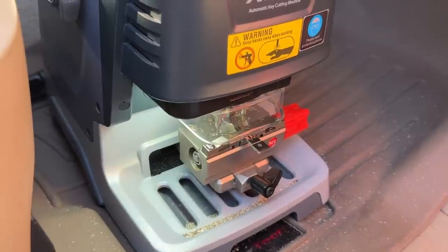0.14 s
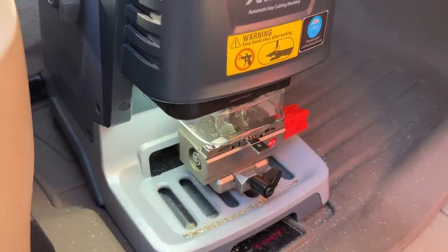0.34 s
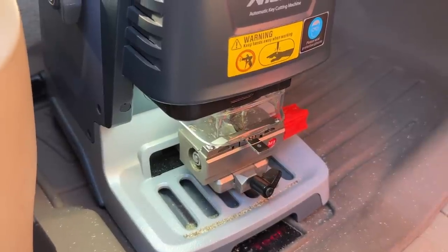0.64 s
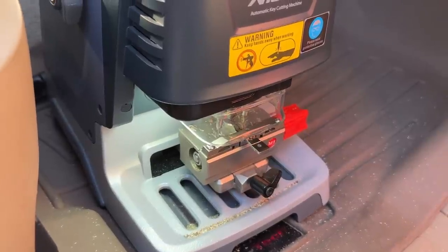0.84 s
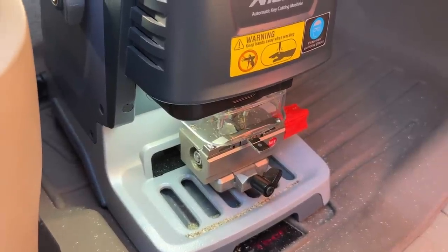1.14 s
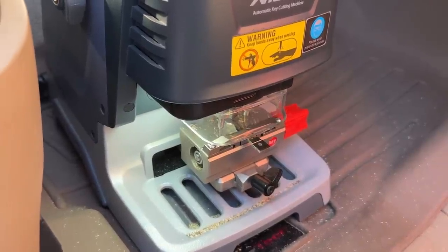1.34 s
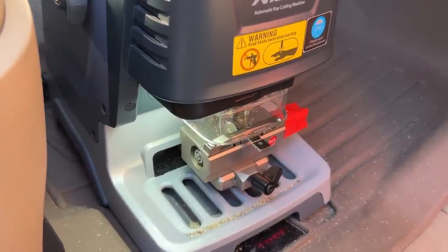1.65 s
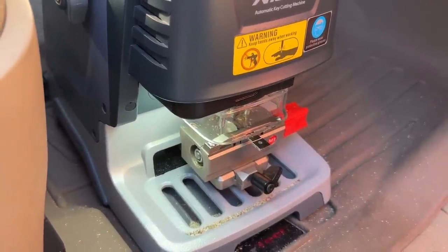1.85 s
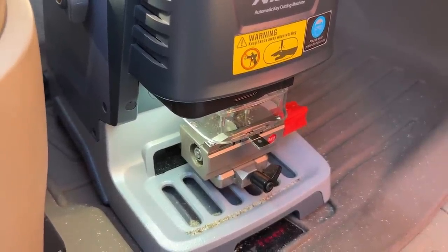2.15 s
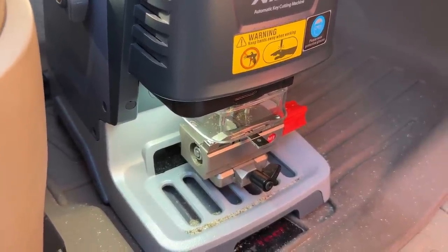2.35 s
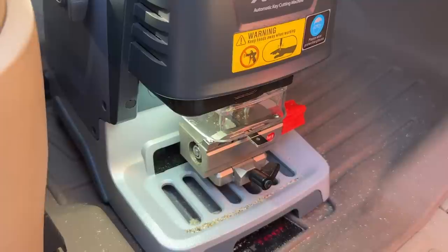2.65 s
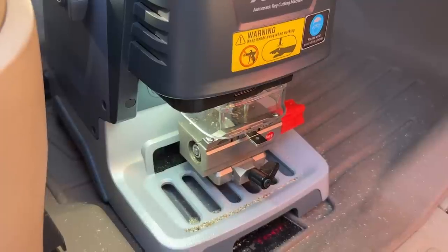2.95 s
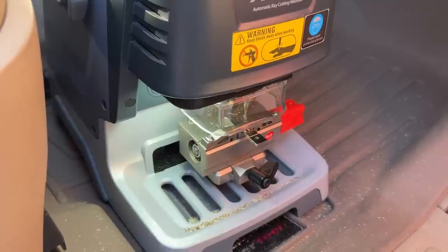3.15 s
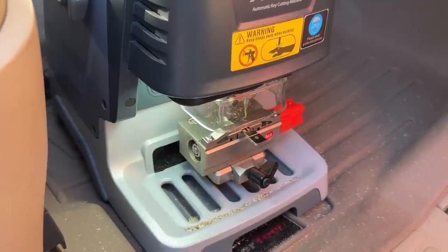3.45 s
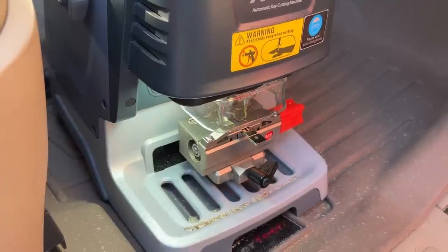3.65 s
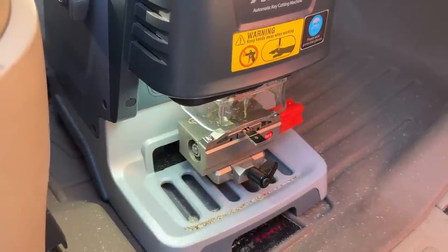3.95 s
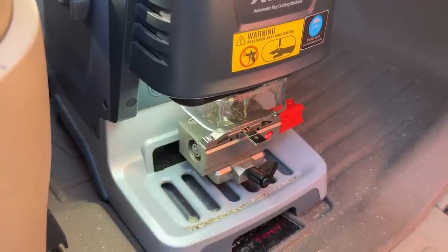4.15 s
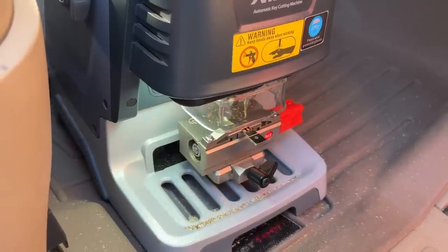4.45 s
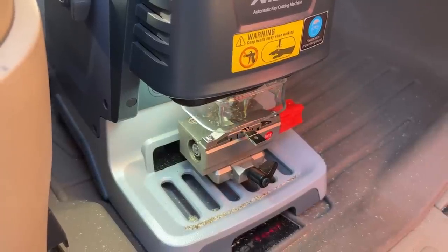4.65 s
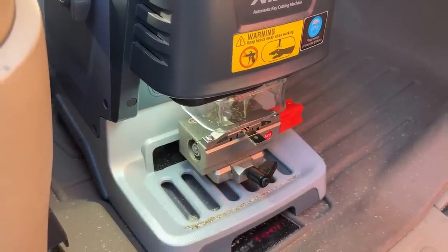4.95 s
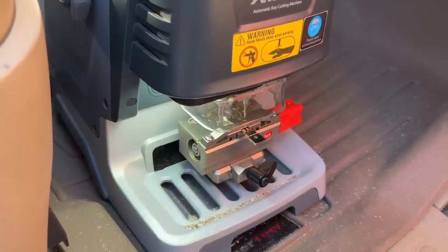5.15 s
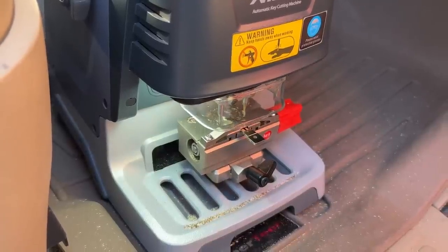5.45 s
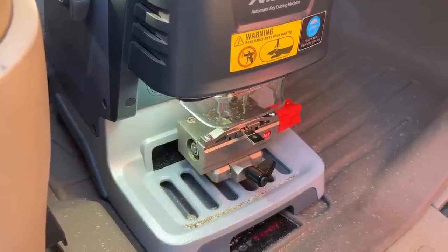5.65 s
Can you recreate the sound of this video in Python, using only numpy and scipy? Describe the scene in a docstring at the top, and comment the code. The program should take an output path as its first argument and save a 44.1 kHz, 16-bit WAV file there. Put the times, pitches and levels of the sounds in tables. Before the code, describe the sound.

A small key-cutting machine hums and grinds steadily, lifts with a quick whine, trims briefly again, then its motor slides down in pitch.

```python
"""A small automatic key cutter on a bench, over low workshop rumble: the carriage steppers slow from a traverse
and the cutter mills a blank while the spindle hums at its turning rate. It lifts for a fast, whining traverse and
trims once more; the drive brakes the spindle, its tones slide down, and the carriage jerks off on a last traverse.
Tones lock to the running count of spindle turns; chips, air and rumble are shaped noise, heard at two close ports."""
import sys
import numpy as np
from scipy import signal
from scipy.fft import rfft, irfft, next_fast_len
from scipy.io import wavfile

SR = 44100
rng = np.random.default_rng(int(sys.argv[2]) if len(sys.argv) > 2 else 0)


def materialize(psi):
    """Save the field psi as 16-bit PCM at rate SR to the path in sys.argv[1].

    A 1-D psi becomes a single channel; in a 2-D psi each row is a channel.
    """
    bounded = np.clip(np.atleast_2d(psi).T, -1, 1)
    quanta = np.round(bounded * 32767).astype(np.int16)
    wavfile.write(sys.argv[1], SR, quanta)


N = 256220


def amp(db):
    """Gain of a level in dB."""
    return 10 ** (np.asarray(db) / 20)


def seconds():
    """Time of every sample."""
    return np.arange(N) / SR


def white():
    """White noise of rms 1."""
    return rng.standard_normal(N)


def gate(on_s, off_s, fade_s):
    """0 to 1 and back between two times, with straight edges."""
    t = seconds()
    return np.clip(np.minimum(t - on_s, off_s - t) / fade_s, 0, 1)


def at_hz(rows, hz):
    """Columns of a table read on a log-frequency axis."""
    edge_hz, *columns = np.transpose(rows)
    log_hz = np.log(np.maximum(hz, 1))
    return [np.interp(log_hz, np.log(edge_hz), column) for column in columns]


def drift(rate_hz):
    """Slow random curve of spread 1: white noise through a two-pole lowpass, run in for 1 s."""
    r = np.exp(-2 * np.pi * rate_hz / SR)
    slow = signal.lfilter([1], [1, -2 * r, r * r], rng.standard_normal(N + SR))[SR:]
    return slow / slow.std()


def coloured(x, spectrum):
    """Shapes a white signal to a spectrum; rms 1."""
    size = next_fast_len(N)
    gain_db, = at_hz(spectrum, np.fft.rfftfreq(size, 1 / SR))
    out = irfft(rfft(x, size) * amp(gain_db), size)[:N]
    return out / out.std()


def tone(cycles, rms_db, waver_db, rate_hz=14.0):
    """A sine on a running count of cycles, its level wavering a little."""
    level = np.sqrt(2) * amp(rms_db + waver_db * drift(rate_hz))
    return level * np.sin(2 * np.pi * (cycles + rng.random()))


RUN_TURNS_PER_S, OVERSHOOT_TURNS_PER_S, SETTLE_S = 200.3, 4.53, .328
# drive braking the spindle: (time [s], speed loss [turns/s per s])
BRAKING = [(3.616, 0), (4.085, 36.7), (4.676, 102.6), (4.965, 109.6), (5.25, 96.8), (5.81, 87.7)]


def spindle_speed():
    """Turns per second: settles from a small overshoot, then the drive brakes it."""
    t = seconds()
    loss_per_s = np.interp(t, *np.transpose(BRAKING))
    overshoot = OVERSHOOT_TURNS_PER_S / np.cosh(t / SETTLE_S)
    return RUN_TURNS_PER_S + overshoot - np.cumsum(loss_per_s) / SR


# free spindle, bench mount resonating near full speed: (speed below running [turns/s], first order [dB],
# third order [dB], flute hiss [dB], air and bearing whirr [dB])
FREE_SPIN = [(-15.5, -17, -32.5, -58.5, -31.5), (-0.5, -20, -43, -53.5, -43), (6.5, -24, -45, -59.5, -45),
             (9, -27, -42.5, -59.5, -44.5), (15, -32.5, -53.5, -73, -47.5), (19, -38.5, -52, -72, -51),
             (28, -40, -62, -71, -49.5), (45, -64, -65, -78.5, -51), (50, -43.5, -64.5, -81, -53),
             (71.5, -47, -65, -82, -54.5), (100.5, -57, -72, -82, -55.5), (161, -75, -82, -87, -53.5)]


def free_spin(speed):
    """Levels of the unloaded spindle in dB, set by its speed alone."""
    lost, *levels = np.transpose(FREE_SPIN)
    return [np.interp(RUN_TURNS_PER_S - speed, lost, db) for db in levels]


# cuts: (touch [s], lift [s], decay constant [s], milling hiss once deep [dB],
# third order from the flutes [dB], change of the pole tones [dB])
CUTS = [(.07, 2.795, 0.036, -39.5, -33, -4), (3.46, 3.965, 0.097, -38.5, -32, 2)]
TOUCH_S = 0.046            # bite rise
CHIP_POWER = 3             # chips stop sooner than the load on the spindle
LOADED_DB = 3.0            # first-order gain under load
ASIDE = 0.52               # share of the free third order that the flutes cannot cancel
SHALLOW_DB, DEEPEN_S = -5.5, 0.27   # a cut starts this much softer and deepens


def bites():
    """Cutter engagement 0-1, one row a cut: straight rise, exponential release."""
    t = seconds()
    rows = []
    for touch_s, lift_s, decay_s, *_ in CUTS:
        rise = np.clip((t - touch_s) / TOUCH_S, 0, 1)
        rows.append(rise * np.exp(-np.maximum(t - lift_s, 0) / decay_s))
    return np.array(rows)


def shake(bite, first_db, third_db):
    """Load lifts the first order; flutes oppose the free third order, so it dips as they touch and lift."""
    flutes = sum(amp(cut[4]) * b for cut, b in zip(CUTS, bite))
    free_third = amp(third_db)
    third = np.hypot(flutes - free_third, ASIDE * free_third)
    return first_db + LOADED_DB * bite.sum(axis=0), 20 * np.log10(third)


# further spindle orders: (order, level over third order [dB], extra when running free [dB])
OVERTONES = [(2.0, -9.5, -2), (4.0, -13.5, 5), (5.0, -16, 6), (6.0, -15, 2), (7.0, -21, -3.5),
             (8.0, -29, 5.5), (10.0, -21, -6), (12.0, -30, 2)]


def spindle(turns, free, first_db, third_db):
    """Unbalance shakes the machine once a turn; the flutes add higher orders."""
    out = tone(turns, first_db, 0.18) + tone(3 * turns, third_db, 0.91)
    for order, over_db, free_db in OVERTONES:
        out += tone(order * turns, third_db + over_db + free_db * free, 1.1)
    return out


# milling spectrum: (frequency [Hz], relative level per Hz [dB])
CHIPS = [(200, -16), (500, -8), (800, -3), (1300, -3.5), (1650, -7.5), (2100, -3.5), (2800, -1.5),
         (3500, -5.5), (4300, -1.5), (5200, -10), (7600, -11), (8500, -9.5), (9500, -16.5), (10300, -8.5),
         (12000, -23), (14500, -16), (16000, -26.5)]


def milling(turns, once=0.22, twice=0.27):
    """Chips break off as dense uneven clicks, bunched on each turn of the cutter; rms 1."""
    clicks = white() * amp(2.5 * np.minimum(rng.exponential(1, N), 4))
    bunching = 1 + once * np.cos(2 * np.pi * turns) + twice * np.cos(4 * np.pi * turns + 1.1)
    load = amp(0.88 * drift(1.2) + 0.72 * drift(35.0))
    return coloured(clicks * bunching * load, CHIPS)


def chip_gain(bite, free_db):
    """Gain of the milling hiss: chips during a cut, bare flutes between, summed as powers."""
    t = seconds()
    cutting = 0
    for (touch_s, _, _, hiss_db, *_), b in zip(CUTS, bite):
        shallow = np.exp(-np.maximum(t - touch_s, 0) / DEEPEN_S)
        cutting = cutting + amp(hiss_db + SHALLOW_DB * shallow) * b ** CHIP_POWER
    return np.hypot(cutting, amp(free_db))


POLE_ORDER = 10.458        # motor pole tone, cycles per spindle turn
# pole tone multiples: (multiple, level before speed and load changes [dB])
POLES = [(1, -61.5), (2, -70.5), (3, -82.5), (4, -82), (5, -83), (6, -78), (7, -86), (8, -85), (10, -91)]
# ball bearings and belt: (order)
BEARING_ORDERS = [4.485, 6.0, 8.3, 13.26, 14.25, 17.2, 18.7, 27.4, 36.2, 45.0, 56.3, 65.1]
# the same tones: (level before the speed change [dB])
BEARING_DB = [-73, -77, -77, -79, -73, -75.5, -73, -72, -79.5, -91, -85, -89]
# offset at running speed, then change per turn/s lost
POLE_OFFSET_DB, POLE_DB_PER_LOST = 2.06, -0.016
BEARING_OFFSET_DB, BEARING_DB_PER_LOST = 0.71, -0.089


def whine(turns, speed, load_db):
    """Motor pole, bearing and belt tones, locked to the spindle; they waver more as it slows."""
    lost = RUN_TURNS_PER_S - speed
    slowing = np.clip(5 * (1 - speed / 200), 0, 1)
    poles = sum(tone(k * POLE_ORDER * turns, db, 1.2 + 2.5 * slowing, 18) for k, db in POLES)
    bearings = sum(tone(order * turns, db, 3 + 2 * slowing, 30)
                   for order, db in zip(BEARING_ORDERS, BEARING_DB))
    pole_gain = amp(POLE_OFFSET_DB + POLE_DB_PER_LOST * lost + load_db)
    return poles * pole_gain + bearings * amp(BEARING_OFFSET_DB + BEARING_DB_PER_LOST * lost)


def leak(motor, cut_hz=4500, gain_db=-12.5):
    """A dull part of the motor whine escapes past the casing."""
    lowpass = signal.butter(2, cut_hz, fs=SR, output="sos")
    return amp(gain_db) * signal.sosfilt(lowpass, motor)


# casing resonances: (frequency [Hz], width [Hz], gain [dB], share reaching the ports out of phase [0-1])
HOUSING = [(739, 7.4, 28.5, 0.3), (790, 34, 17.5, 0.5), (878, 70, 17, 0.52), (928, 80, 13.5, 0.3),
           (1199, 30, 16.5, .4), (1348, 37, 3, 0.6), (1470, 62, -4.5, 0.7), (1603, 29, 14, 0.95),
           (2152, 157, 8, 0), (2315, 58, 19, 0.3), (2616, 64, 8, 0.56), (2666, 31, 22, 0.52),
           (2800, 430, 14, 0.76), (3345, 46, 13.5, 0.08), (3660, 78, 11, 0.17), (4020, 32.6, 31.5, 0.81),
           (4140, 84, 23, 0.92), (4300, 86, 6, .5), (6930, 560, 7, 0.1), (7170, 92, -2, 1),
           (7450, 89, 2.5, 0.8), (8200, 130, 8.5, .4), (9270, 160, 14, 0.7), (11600, 120, 5.5, 0.96),
           (15400, 190, 18, .05)]


def housing(x):
    """The casing rings at its resonances; each reaches the two ports partly in phase, partly against."""
    out = np.zeros((2, N))
    for k, (hz, width_hz, gain_db, against) in enumerate(HOUSING):
        r = np.exp(-np.pi * width_hz / SR)
        against = np.clip(against, 0, 1)
        ring = signal.lfilter([1, 0, -1], [1, -2 * r * np.cos(2 * np.pi * hz / SR), r * r], x)
        late = np.gradient(ring) * SR / (2 * np.pi * hz)     # a quarter cycle apart
        pair = np.sqrt(1 - against ** 2) * ring + against * late * [[1], [-1]]
        out += (-1) ** k * amp(gain_db) * (1 - r * r) / 2 * pair
    return out


# carriage speeding up and braking: (start [s], length [s], from [Hz], to [Hz],
# bend away from the fast end [exponent], from peak level [dB], to peak level [dB])
RAMPS = [(0, .095, 7300, 3300, 2.8, -53, -49), (2.77, .065, 2200, 8500, 1.2, -52, -68),
         (3.21, .09, 2690, 2400, 1.1, -45, -45), (3.287, .165, 9600, 1950, 1.2, -66, -39),
         (5.374, .081, 1900, 9700, 1.1, -39.5, -65), (5.43, .035, 2500, 2460, 1.1, -42, -42)]
RAMP_HOLD_S, RAMP_FADE_S = .004, .012


def ramps(third_db=-10, double_db=-14):
    """The step rate climbs and falls in short stairs; a third of it and its double sound along."""
    out = np.zeros(N)
    stairs_s = (np.floor(seconds() / RAMP_HOLD_S) + .5) * RAMP_HOLD_S
    for start_s, length_s, from_hz, to_hz, bend, from_db, to_db in RAMPS:
        done = np.clip((stairs_s - start_s) / length_s, 0, 1)
        slowed = (done if from_hz > to_hz else 1 - done) ** bend
        step_hz = max(from_hz, to_hz) - abs(from_hz - to_hz) * slowed
        steps = 2 * np.pi * np.cumsum(step_hz) / SR
        wave = np.sin(steps) + amp(third_db) * np.sin(steps / 3) + amp(double_db) * np.sin(2 * steps)
        level_db = from_db + (to_db - from_db) * done + 4 * drift(120.0)
        out += amp(level_db) * gate(start_s, start_s + length_s, RAMP_FADE_S) * wave
    return out


FEED_HZ, FEED_SWELL_S = 932.8, 0.13
# feed tones: (multiple, level [dB])
FEED_ORDERS = [(2.0, -61), (3.0, -47.5), (4.0, -57.5), (5.0, -60), (6.0, -62.5), (7.0, -65.5)]


def feed(bite):
    """Stepper feed tones that swell in and follow the first cut."""
    t = seconds()
    swell = bite ** CHIP_POWER * np.clip((t - CUTS[0][0]) / FEED_SWELL_S, 0, 1)
    return swell * sum(tone(k * FEED_HZ * t, db, 2.9) for k, db in FEED_ORDERS)


TRAVERSE_HZ = 332.4        # repetition rate
# traverse tones: (multiple, level before each traverse's gain [dB])
TRAVERSE_TONES = [(4, -66), (9, -71), (10, -72), (11, -73), (12, -66), (14, -74), (16, -61), (17, -79),
                  (18, -79), (20, -61), (21, -80), (22, -73), (24, -80), (26, -83), (28, -76), (29, -73),
                  (32, -74), (33, -61), (34, -74), (35, -73), (38, -82), (40, -68), (42, -61), (43, -66),
                  (45, -73), (46, -69), (47, -78)]
# driver hiss spectrum: (frequency [Hz], relative level per Hz [dB])
CHOPPER = [(2000, -3.5), (5000, -10.5), (9000, -23.5), (12500, -5), (14000, 3), (16000, -25)]
# fast traverses: (drivers on [s], off [s], hiss after the surge [dB], cruise start [s], cruise end [s],
# tone gain [dB], whistle [Hz], whistle peak factor [dB], whistle end [s])
TRAVERSES = [(-.02, .08, -65, -.02, .08, -14, 15320, -62, .16),
             (2.8, 3.48, -64, 2.82, 3.4, -9, 13890, -61, 3.475),
             (5.372, 5.9, -67, 5.442, 5.9, 0, 14150, -60, 5.46)]
SWITCH_S, SURGE_DB, SURGE_S = 0.014, 9, .2     # drivers switch over this time and hiss harder at first


def traverses():
    """Energised stepper drivers: tones while cruising, hiss, and a narrow-band whistle."""
    t = seconds()
    out = np.zeros(N)
    tones = sum(tone(k * TRAVERSE_HZ * t, db, 1.4) for k, db in TRAVERSE_TONES)
    rough = drift(90.0)
    hiss = coloured(white(), CHOPPER)
    for on_s, off_s, hiss_db, start_s, end_s, tones_db, whistle_hz, whistle_db, until_s in TRAVERSES:
        surge = (amp(SURGE_DB) - 1) * gate(on_s, min(off_s, on_s + SURGE_S), SWITCH_S)
        out += amp(hiss_db) * hiss * (gate(on_s, off_s, SWITCH_S) + surge)
        out += amp(tones_db) * gate(start_s, end_s, SWITCH_S) * tones
        whistle = rough * np.sin(2 * np.pi * whistle_hz * t)   # noise times a sine: a narrow band
        out += amp(whistle_db) * gate(on_s, until_s, SWITCH_S) * whistle
    return out


# carriage jerking off: (time [s], thump [Hz], thump before its soft rise [dB], thump t60 [s],
# rattle before its soft rise [dB], rattle t60 [s])
JERKS = [(5.378, 210, -24, .2, -44, .3)]


def jerks():
    """A soft push sets the housing ringing low and shakes loose parts."""
    out = np.zeros(N)
    rattle = coloured(white(), CHIPS)
    for start_s, thump_hz, thump_db, thump_t60_s, rattle_db, rattle_t60_s in JERKS:
        age = np.maximum(seconds() - start_s, 0)
        thump = np.sin(2 * np.pi * thump_hz * age)
        out += amp(thump_db - 60 * age / thump_t60_s) * (1 - np.exp(-age / 0.0099)) * thump
        out += amp(rattle_db - 60 * age / rattle_t60_s) * (1 - np.exp(-age / 0.0093)) * rattle
    return out


# whirr spectrum: (frequency [Hz], relative level per Hz [dB])
AIR = [(150, 15.5), (300, 3.5), (500, -6.5), (800, -6.5), (1400, 0), (1900, -7), (2800, -3), (3500, -6.5),
       (4500, -10.5), (5400, -11), (7600, -17.5), (10000, -18.5), (16000, -18.5)]


def air_whirr(level_db):
    """Air and bearing noise whose level follows the spindle speed and drifts a little."""
    return amp(level_db + .7 * drift(6.0)) * coloured(white(), AIR)


# workshop spectrum: (frequency [Hz], relative level per Hz [dB])
SHOP = [(12, -78.5), (24, -49), (35, -22), (52, -3), (70, 2), (90, -10.5), (107, 0), (130, -18.5),
        (160, -18.5), (300, -28.5), (600, -36), (1200, -35.5), (2000, -49.5), (4000, -51), (6000, -60.5),
        (16000, -78)]
SHOP_DB = -33


def workshop():
    """Steady low rumble: noise weighted to the bass."""
    return amp(SHOP_DB) * coloured(white(), SHOP)


# stereo image: (frequency [Hz], side over mid [dB], phase of side [rad], share arriving direct [0-1])
IMAGE = [(59.3, -24.5, 1.5, 1), (201, -28, 1.6, 1), (293, -4, 2.2, 0.7), (406, -1.5, 1.5, 0.77),
         (614, -15, -1, 0.5), (920, -4, -0.04, 0.82), (1470, 4.5, 2.5, 0.7), (2070, -7, 1, .3),
         (2640, 1.5, 0.5, .6), (3520, -8.5, 0.2, 0.7), (4080, -5, 3.3, .5), (4600, -11, -1.7, 0.6),
         (5220, 1, 2.5, 0.2), (6820, -8, -14.5, 0.43), (7640, 8.5, -4, .6), (8260, -13.5, -0.7, .6),
         (10490, 8, -1.5, 0.8), (10930, 38, 0, 0.92), (12000, 33.5, 2, 0.4), (12700, -10, 2.5, 0.2),
         (13700, 0.5, 1.8, 0.4), (14100, -58.5, 5, .5), (16000, -37, 0, .5)]
ROOM_T60_S = 0.28


def ports(x):
    """Two ports share the sound: the side signal is part direct, phase-turned, part scattered by the room."""
    size = next_fast_len(N + SR // 2)
    side_db, turn_rad, direct = at_hz(IMAGE, np.fft.rfftfreq(size, 1 / SR))
    decay = amp(-60 * np.arange(SR // 2) / SR / ROOM_T60_S)
    tail = rfft(rng.standard_normal(SR // 2) * decay, size)
    angle = np.arctan(amp(side_db))
    direct = np.clip(direct, 0, 1)
    scattered = np.sqrt(1 - direct ** 2) * tail / np.abs(tail)
    spread = direct * np.exp(1j * turn_rad) + scattered
    sound = rfft(x, size)
    mid = irfft(sound * np.cos(angle), size)[:N]
    side = irfft(sound * np.sin(angle) * spread, size)[:N]
    return np.array([mid + side, mid - side])


def scene():
    """Machine and workshop as the two ports hear them."""
    speed, bite = spindle_speed(), bites()
    turns = np.cumsum(speed) / SR
    first_db, third_db, flute_db, whirr_db = free_spin(speed)
    free = 1 - bite.sum(axis=0)
    hum = spindle(turns, free, *shake(bite, first_db, third_db))
    cutting = chip_gain(bite, flute_db) * milling(turns)
    pole_load_db = np.array(CUTS)[:, 5] @ bite
    motor = whine(turns, speed, pole_load_db)
    steps = ramps()
    whirr = air_whirr(whirr_db)
    casing = housing(motor + amp(-31) * steps + amp(-15.0) * whirr)
    machine = hum + cutting + leak(motor) + steps + feed(bite[0]) + traverses() + jerks() + whirr
    return ports(machine + workshop()) + casing


def record(dry, bass_cut_hz=36.0, top_cut_hz=15780):
    """The microphone drops the deepest bass; the top is cut steeply."""
    lean = signal.sosfilt(signal.butter(2, bass_cut_hz, "high", fs=SR, output="sos"), dry)
    return signal.sosfilt(signal.ellip(12, .5, 70, top_cut_hz, fs=SR, output="sos"), lean)


dry = scene()
out = record(dry)
materialize(out)
```